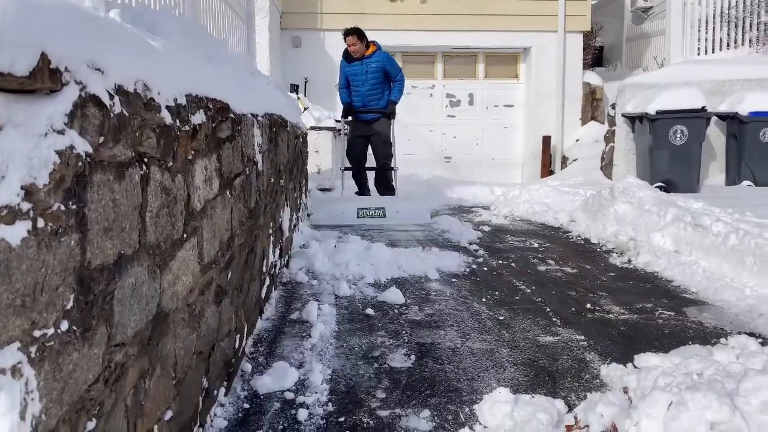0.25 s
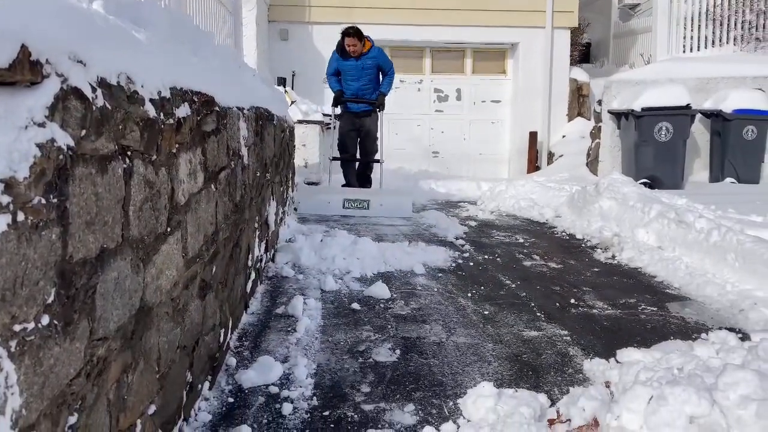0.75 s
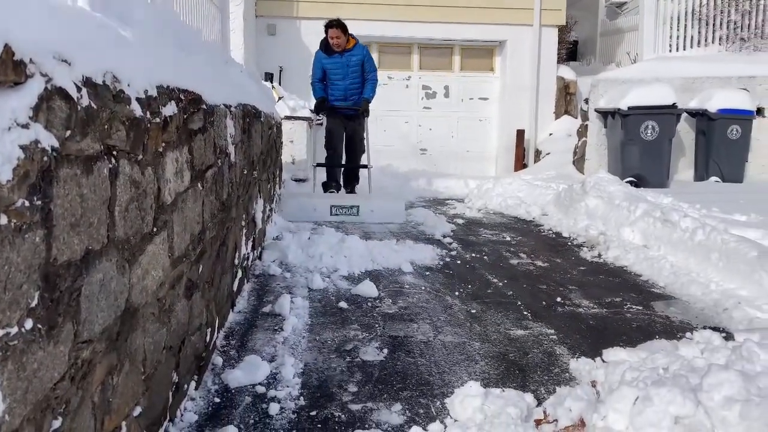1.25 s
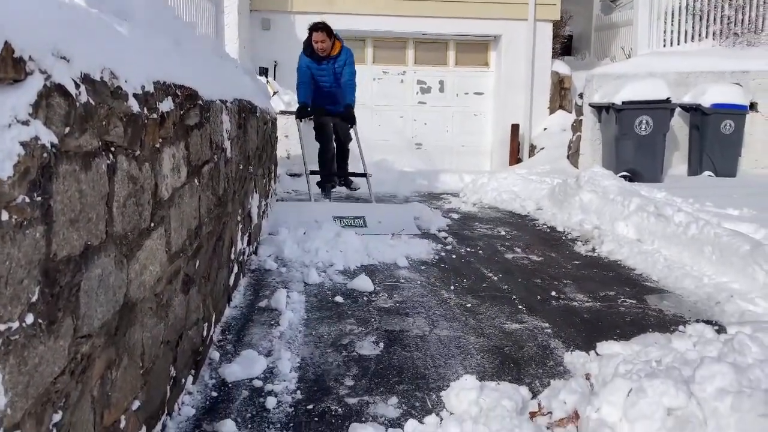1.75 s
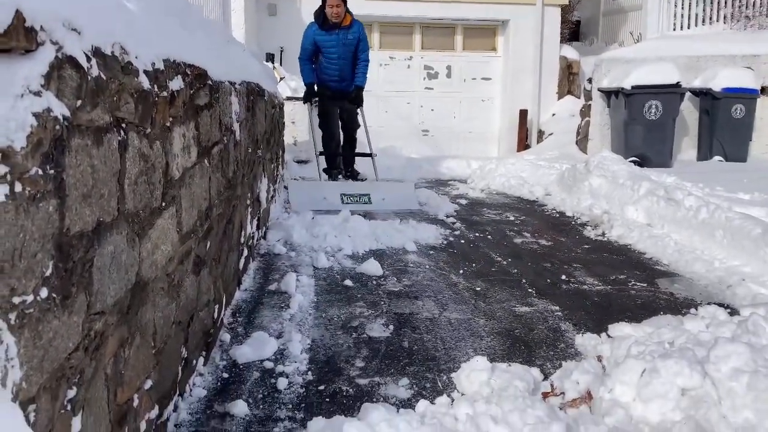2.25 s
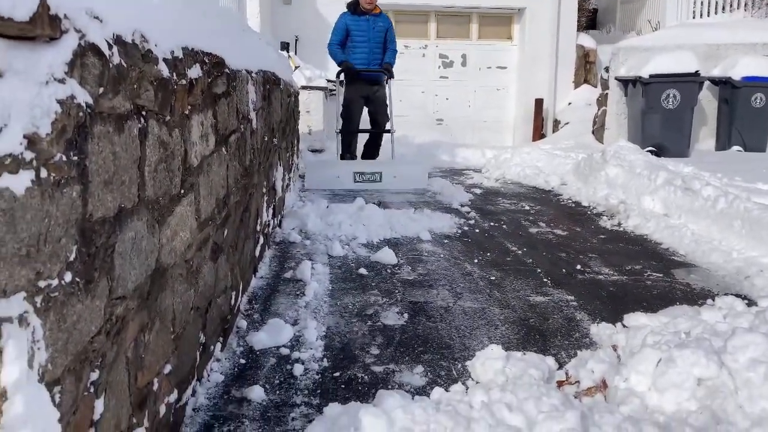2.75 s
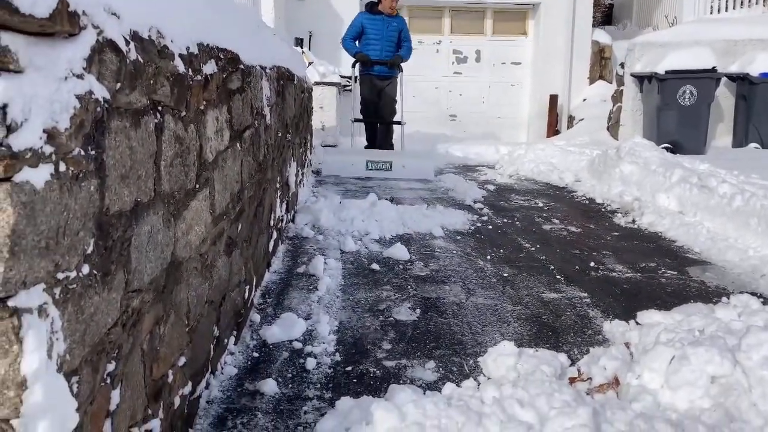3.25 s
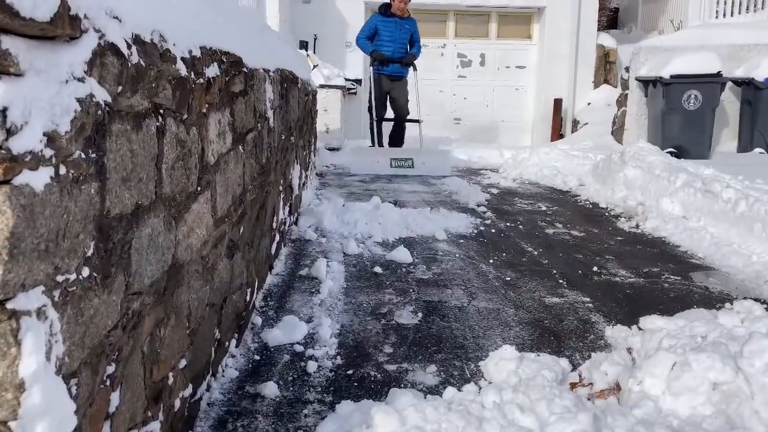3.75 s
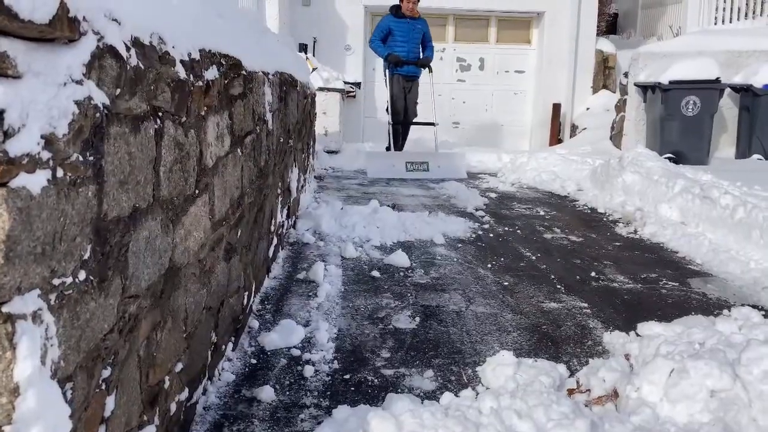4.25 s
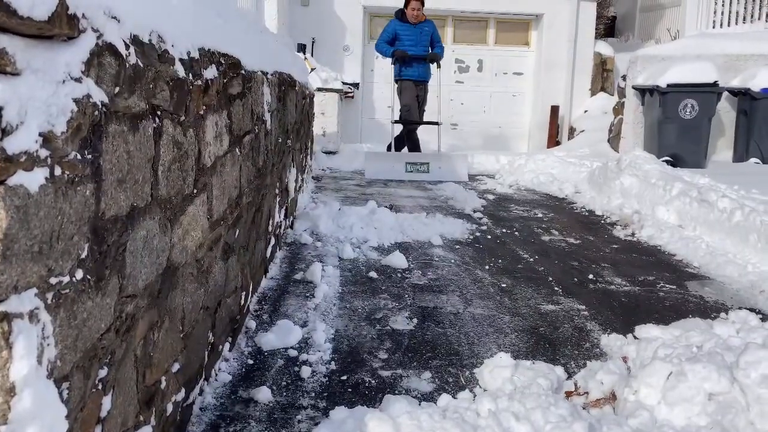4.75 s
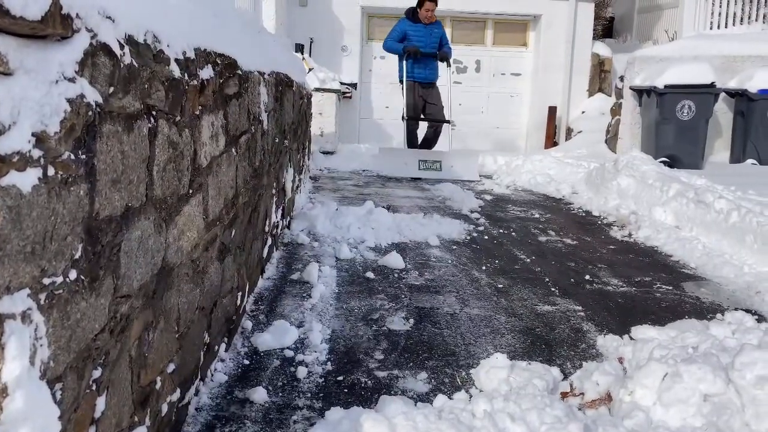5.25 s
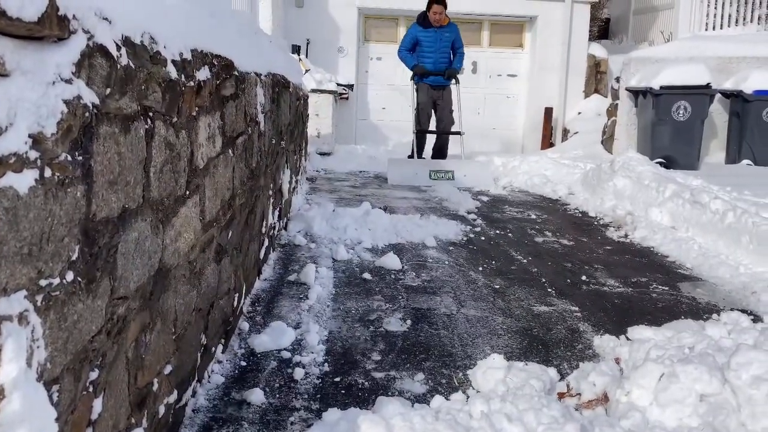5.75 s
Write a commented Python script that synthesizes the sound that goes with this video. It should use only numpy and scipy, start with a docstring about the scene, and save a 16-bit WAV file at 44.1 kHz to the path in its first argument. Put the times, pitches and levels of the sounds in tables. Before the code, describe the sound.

Outdoors on an icy driveway, a wide plastic snow pusher is shoved in short uneven strokes. Its hollow scoop drums and booms while the edge rasps over asphalt and crushes gritty ice. Knocks and clacks punctuate the pushes. Scraping is frequent until past four seconds, then nearly stops for a second with faint boot shuffles, and resumes strongly. The stereo microphone catches quiet air and small low wind buffets.

```python
"""Snow pusher on icy asphalt

A wide plastic snow pusher is shoved in strokes along an icy driveway, beside a stone wall.
Random slips of its edge drum on the scoop; slips and stones ring the edge; coarse ice rattles the ribs.
Filtered click trains make the hiss of crushed grit; single clicks drive ridge knocks and edge landings.
Boots shuffle, a few ice crumbs tick, and filtered noise gives wind buffets, tumbling snow and outdoor air."""
import sys
import numpy as np
from scipy import signal
from scipy.fft import rfft, irfft, next_fast_len
from scipy.io import wavfile
from scipy.ndimage import uniform_filter1d

SR = 44100
rng = np.random.default_rng(int(sys.argv[2]) if len(sys.argv) > 2 else 0)


def dump(signal):
    """Clip the signal to [-1, 1] and save it as 16-bit WAV at the path in sys.argv[1]."""
    limited = np.clip(np.atleast_2d(signal).T, -1, 1)
    pcm = np.round(limited * 32767).astype(np.int16)
    wavfile.write(sys.argv[1], SR, pcm)


N = 264159
TIME_S = np.arange(N) / SR
CUTOFF_HZ = 16000
AIR_DB = -42.5  # before the air's trim
TAIL_S = 0.055  # time constant of the tail's power

# All dB are relative; each voice adds its own trim.
# Distant outdoor air. Each row: frequency in Hz, density in dB per Hz.
AIR_SPECTRUM = [(12, -41), (20, -21), (44, -3), (70, -6.5), (146, -18), (216, -15), (400, -23), (700, -30),
                (1500, -36), (2800, -43), (4500, -53), (9000, -57), (16000, -55)]
# Boots shuffle in the snow. Each row: centre in seconds, level in dB, bell length in seconds.
SHUFFLES = [(.02, -61, 0.053), (.14, -58, .035), (4.96, -54, 0.023), (5.005, -52.5, 0.02),
            (5.05, -57, 0.024), (5.135, -52.5, 0.029), (5.185, -58, .015)]
# Trodden snow. Each row: frequency in Hz, density in dB per Hz.
SNOW_SPECTRUM = [(200, -16), (700, 3), (1600, -2), (2100, -2), (2800, 0.5), (4500, -9), (8000, -12),
                 (15000, -19)]
# Pushes of the blade. Each row: start in seconds, length in seconds, attack in seconds,
# release in dB per second, swell from start to end in dB; end levels of scoop boom, edge rasp and
# grit hiss in dB; from the blade's lean, tilts of scoop, edge and grit in dB, strip ring over hiss in dB.
SHOVES = [ (0.219, 0.043, 0.013, 258, 3.5, -16, -23.5, -32.5, -3, -2, 3.5, -17),
          (0.302, 0.19, 0.0069, 260, -18.5, -39.5, -53.5, -55, -10.5, -8, -0.5, -14),
          (0.53, 0.11, 0.0096, 258, 10.5, -19.5, -30.5, -42, -10, -6, 1, -6),
          (0.72, .16, 0.051, 246, 18, -10, -20, -38, -4.5, -10, 1.5, -9),
          (.95, .09, .013, 236, 6, -20.5, -27, -43.5, -7, -6, 3, -22),
          (1.027, 0.12, 0.029, 257, -3.5, -26, -34.5, -35.5, 1, -8, 4.5, -24),
          (1.113, 0.32, .034, 208, 8, -9, -14, -31, -2.5, -2, -2.5, -27),
          (1.441, 0.16, .05, 231, -4, -13.5, -21, -32.5, 5, 1, -4.5, -23),
          (2.022, 0.039, 0.0054, 395, 0.5, -13, -21, -32, -3.5, 6, -5, -12),
          (2.177, .045, 0.021, 230, 1, -21.5, -30.5, -34.5, -6, -1, 5, -4),
          (2.281, 0.24, 0.012, 239, -1, -20.5, -34, -49.5, -6.5, -4, 2.5, -14),
          (2.515, 0.09, 0.024, 260, -6, -51, -48, -46.5, -1, 1, 4.5, -19),
          (2.624, 0.19, 0.06, 205, 1, -18, -26.5, -37, 7.5, -3, 2.5, -27),
          (2.804, 0.14, 0.023, 241, -2, -26, -39, -43.5, -2, 1, -2.5, -11),
          (2.968, 0.078, 0.042, 210, 3.5, -15.5, -22.5, -35, -4, -9, -4.5, -6.5),
          (3.046, 0.14, 0.024, 330, -3.5, -27, -35, -42.5, 2, -1.5, 0, -8),
          (3.377, 0.13, .006, 230, 11.5, -15, -17.5, -30.5, -3, -0.5, -2, -8),
          (3.557, 0.18, 0.027, 300, 4, -34.5, -42, -54.5, -6, -9, 0, -3.5),
          (3.793, 0.11, 0.0082, 217, 22, -15, -20, -34.5, -5, 1, -2, -5),
          (4.002, 0.26, 0.038, 183, 17, -15.5, -25.5, -44, -6.5, -4.5, -4, -13),
          (4.268, .142, 0.03, 362, 5, -22.5, -36, -48.5, -15, 5, -1, -13),
          (5.3, 0.1, 0.022, 350, 26.5, -19, -25, -42, -4, 5, -7, -9),
          (5.465, .28, 0.017, 193, 15.5, -14.5, -23.5, -42, -10, 5.5, -4, -10),
          (5.74, 0.29, 0.025, 205, 5, -14.5, -22, -40.5, -4.5, 14, -4.5, -7)]
# How a voice follows a push. Each row: build-up in seconds (sign has no effect), share of the swell,
# share of the release rate, lingering tail in dB.
BOOM_RESPONSE = (-0.0065, 1.0, 0.65, -50)
RASP_RESPONSE = (0.01, 1.0, 1.0, -17.5)
HISS_RESPONSE = (0.02, 0.75, 1.2, -12)
# Short uneven moments in the scrape. Each row: centre in seconds, bell length in seconds,
# change of boom in dB, of rasp in dB, of hiss in dB.
UNEVEN_MOMENTS = [(0.383, 0.023, 5, -7, -7), (0.915, 0.025, -3.5, 2, 9), (1.235, 0.021, 2, 4.5, 1),
                  (1.356, 0.018, 4, 2.5, 3.5), (1.429, 0.032, 4.5, -3.5, 2), (1.52, 0.019, 2, 1.5, 4),
                  (2.045, 0.01, 6, 0.5, 5), (2.213, .01, 8.5, -3, -2.5), (2.299, 0.021, 0, 1.5, 7.5),
                  (2.67, 0.032, 0.5, 2.5, 4), (2.79, 0.012, 2.5, 3.5, -3.5), (3.023, 0.0084, -3, 3, 4.5),
                  (3.208, 0.017, 6.5, 2.5, 3.5), (3.483, 0.0075, 4, 0.5, 3.5), (3.822, 0.023, -2, -0.5, 8),
                  (3.916, .012, 2.5, -1.5, -2.5), (4.164, 0.037, 4, 3.5, 2), (5.316, 0.018, -2, 1, 10.5),
                  (5.395, 0.0075, 1.5, 4, 4)]
# Scoop resonances. Each row: frequency in Hz, width in Hz, gain in dB.
SCOOP_MODES = [(154.2, 29, -3), (217.7, 32, -6), (273, 22, 0), (332.5, 26.6, 7), (368, 22, -9),
               (416.5, 21, 0), (473, 22, 0), (470.7, 5.7, -7.5)]
# Stiff edge resonances. Each row: frequency in Hz, width in Hz, gain in dB.
EDGE_MODES = [(646, 87, 9.5), (759, 69, 7), (883, 100, -5.5), (1005, 22, 1.5), (1162, 15, -5.5)]
# Moulded rib resonances. Each row: frequency in Hz, width in Hz, gain in dB.
RIB_MODES = [(1330, 70, -1.5), (1586, 50, 6.5), (1734, 140, 6.5), (1853, 78, -0.5), (2146, 58, -2),
             (2430, 150, 1.5), (2740, 240, -14.5), (3240, 120, -6.5), (3360, 75, -9), (3940, 110, -1)]
# Thin wear strip along the edge. Each row: frequency in Hz, width in Hz, gain in dB.
STRIP_MODES = [(4080, 70, -8), (4330, 100, 4), (4520, 70, -4), (7300, 250, -8), (7800, 250, -6)]
# Crushed grit. Each row: frequency in Hz, density in dB per Hz.
GRIT_SPECTRUM = [(900, -11), (2000, 3), (2700, 1), (3300, -0.5), (3750, 1.5), (4100, -0.5), (5500, -2.5),
                 (6400, 2), (7100, 0.5), (8200, -4), (10500, -3.5), (13000, -6), (16000, -15)]
# Wall and ground reflections widen the blade. Each row: frequency in Hz, side less mid in dB.
BLADE_WIDTH = [(140, -23.5), (210, -37), (330, -14), (500, -8), (770, -4), (1170, 1), (2700, -7)]
# Grit arrives more directly. Each row: frequency in Hz, side less mid in dB.
GRIT_WIDTH = [(2000, -0.5), (5500, -1), (9000, -14), (16000, -68)]
# The edge is set down on the asphalt. Each row: time in seconds, peak in dB.
LANDINGS = [(.227, -9), (.535, -15), (2.027, 5.5), (2.187, -10), (2.638, -10), (2.983, -16), (3.385, -11),
            (3.876, -3), (4.588, -18.5), (5.387, -18)]
# The blade catches on a ridge; the two faintest rows, at 4.676 and 5.184 s, are soft handling knocks # in the
# rest between strokes. Each row: time in seconds, peak in dB, whole-blade flex in dB.
KNOCKS = [(0.256, -5, -6.5), (0.269, -4, -18), (.318, -12, -38), (0.626, -10, -14), (.765, -18, -12.5),
          (0.858, -7, -24), (0.873, -6, -31), (1.186, 0, -6.5), (1.35, -13, -15), (1.365, 2, -24),
          (1.409, -13, -16), (1.512, -4, -13), (2.027, -14, -36), (2.045, -9, -4), (2.223, -12, -12),
          (3.022, -25, -4), (3.898, -3.5, -38), (4.156, -3, -13), (4.591, -21.5, -40), (4.676, -43, -34),
          (5.184, -46, -42), (5.404, -11, -7.5), (5.748, -7, -16), (5.838, -6.5, -11.5)]
# Flex of the whole blade. Each row: frequency in Hz, width in Hz, gain in dB.
FLEX_MODE = [(193, 66, 2.5)]
# Puffs of air on the microphone. Each row: centre in seconds, peak in dB, bell length in seconds.
PUFFS = [(0.263, -29, 0.014), (.605, -32, 0.084), (0.906, -32, 0.031), (1.115, -30, 0.045),
         (1.423, -26, 0.064), (1.77, -34.5, .02), (2.04, -24.5, 0.013), (3.49, -33, 0.036),
         (3.616, -20.5, 0.011), (4.12, -20.5, 0.016), (4.237, -23, 0.014), (4.45, -33.5, 0.043),
         (4.542, -27, 0.0089), (4.963, -35, 0.014), (5.19, -31.5, 0.015), (5.273, -37, 0.013),
         (5.405, -16, 0.031), (5.585, -22.5, 0.054)]
# Wind on the ports. Each row: frequency in Hz, density in dB per Hz.
WIND_SPECTRUM = [(15, -35), (35, -18), (60, 7.5), (90, 4.5), (130, -5.5), (200, -8.5), (500, -66)]
# Ice crumbs crack or fall. Each row: time in seconds, peak in dB, nominal pitch in Hz.
CRUMBS = [(0.884, -14, 7900), (1.486, -6.5, 4030), (3.46, -5, 4300), (4.145, -22, 8600),
          (4.473, -26.5, 5800), (4.736, -35.5, 3980), (4.996, -28, 3500)]


def from_db(db):
    """Decibels to gain."""
    return 10 ** (np.asarray(db) / 20)


def rms_one(x):
    """Scale to unit power."""
    return x / np.sqrt(np.mean(x ** 2) + 1e-20)


def steady(x, span_s):
    """Unit power over every short span; faster grain stays."""
    power = uniform_filter1d(x ** 2, max(int(span_s * SR), 8))
    return x / np.sqrt(power + 1e-12)


def colour(x, spectrum):
    """Filter by (Hz, dB) points joined on a log axis."""
    hz, db = np.transpose(spectrum)
    size = next_fast_len(N + 8192)
    bins_hz = np.maximum(np.arange(size // 2 + 1) * SR / size, 1)
    gain = from_db(np.interp(np.log(bins_hz), np.log(hz), db))
    return irfft(rfft(x, size) * gain, size)[..., :N]


def resonate(x, modes):
    """Parallel two-pole resonances (Hz, width Hz, dB)."""
    out = 0
    for hz, width_hz, db in modes:
        r = np.exp(-np.pi * width_hz / SR)
        poles = [1, -2 * r * np.cos(2 * np.pi * hz / SR), r * r]
        zeros = np.array([1, 0, -1]) * (1 - r * r) / 2
        out = out + from_db(db) * signal.lfilter(zeros, poles, x + 1e-18)
    return out


def band(x, low_hz, high_hz):
    """Second-order band-pass."""
    sos = signal.butter(2, [low_hz, min(high_hz, .45 * SR)], "band", fs=SR, output="sos")
    return signal.sosfilt(sos, x)


def tilt(x, pivot_hz, tilt_db):
    """Raise what lies above the pivot against what lies below it."""
    low = signal.sosfiltfilt(signal.butter(3, pivot_hz, fs=SR, output="sos"), x)
    return low * from_db(-tilt_db / 2) + (x - low) * from_db(tilt_db / 2)


def die_away(x, decay_s):
    """Each click becomes a falling exponential of the same height."""
    return signal.lfilter([1], [1, -np.exp(-1 / (decay_s * SR))], x + 1e-18)


def grains(per_s, spread_db):
    """Clicks of random sign at random moments, mostly small and a few large."""
    hits = rng.random(N) < per_s / SR
    heights = from_db(spread_db * np.minimum(rng.exponential(1, N), 4))
    return hits * heights * rng.choice([-1, 1], N)


def strikes(rows):
    """One click for each (s, dB)."""
    clicks = np.zeros(N)
    for s, db in rows:
        clicks[int(s * SR)] = from_db(db)
    return clicks


def bell(centre_s, length_s):
    """Gaussian rise and fall."""
    return np.exp(-.5 * ((TIME_S - centre_s) / length_s) ** 2)


def swells(rows):
    """Bell-shaped rises of level, one for each (s, dB, length s)."""
    return sum(from_db(db) * bell(s, length_s) for s, db, length_s in rows)


def stereo(mid, side, width, left_db):
    """Left and right from a common part and a scattered part."""
    side = colour(side, width)
    return np.array([(mid + side) * from_db(left_db / 2), (mid - side) * from_db(-left_db / 2)])


def delay_left(pair, lag_ms):
    """Sound reaches the left port a little later."""
    return np.array([np.interp(TIME_S - lag_ms / 1000, TIME_S, pair[0]), pair[1]])


def drift(per_s):
    """A slow wander between random points of unit spread."""
    return np.interp(TIME_S * per_s, np.arange(1000), rng.standard_normal(1000))


def rub(x, modes, wander_db):
    """The contact point roams along the edge, favouring now one resonance, now another."""
    return sum(resonate(x * from_db(wander_db * drift(12)), [mode]) for mode in modes)


def scatter(x, share_db, decay_s):
    """Ripples cross the blade many times, leaving dense fine resonances."""
    size = 2048
    ripples = rng.standard_normal(size) * np.exp(-TIME_S[:size] / decay_s)
    return x + from_db(share_db) * signal.fftconvolve(x, ripples / np.linalg.norm(ripples))[:N]


def air():
    """The quiet neighbourhood: steady coloured noise."""
    mid, side = rms_one(colour(rng.standard_normal((2, N)), AIR_SPECTRUM))
    return from_db(AIR_DB - 1.0) * (mid + side * [[1], [-1]]) * from_db([[1.2], [-1.2]])


def boots():
    """Snow crunches softly under a shifting foot: coloured clicks in short swells."""
    crunch = np.array([grains(1500, 4.2) for _ in range(2)])
    return swells(SHUFFLES) * rms_one(colour(crunch, SNOW_SPECTRUM))


def envelope(start_s, length_s, attack_s, release_db_per_s, swell_db, end_db,
             build_up_s, swell_share, release_share):
    """The edge takes hold, the pressure swells evenly, then the sound drops away."""
    age_s = TIME_S - start_s
    held_db = end_db + swell_share * swell_db * (np.clip(age_s / length_s, 0, 1) - 1)
    release_db = -release_share * release_db_per_s * np.maximum(age_s - length_s, 0)
    onset = np.clip(age_s / np.hypot(attack_s, build_up_s), 0, 1)
    return onset * from_db(held_db + release_db)


def uneven_moments():
    """Boom, rasp and hiss each briefly rise or fall, in bells of dB."""
    return sum(np.outer(changes_db, bell(s, length_s)) for s, length_s, *changes_db in UNEVEN_MOMENTS)


def shoves():
    """Pushes and their faint tails set boom, rasp and hiss in dB; hiss power weights the lean's colour."""
    start, length, attack, release, swell, boom, rasp, hiss, *lean = np.transpose(SHOVES)
    voices = (boom, BOOM_RESPONSE), (rasp, RASP_RESPONSE), (hiss, HISS_RESPONSE)
    levels_db = []
    for end_db, (*response, tail_db) in voices:
        pushes = zip(start, length, attack, release, swell, end_db)
        each = np.array([envelope(*push, *response) for push in pushes]) ** 2 + 1e-14
        power = each.sum(axis=0)
        tail = from_db(tail_db) ** 2 * die_away(power, TAIL_S) / (TAIL_S * SR)
        levels_db.append(10 * np.log10(power + tail))
    # each and power are now those of the hiss
    return np.array(levels_db) + uneven_moments(), np.array(lean) @ each / power


def scoop(slips, boom_db, tilt_db):
    """Slips of the edge drum on the hollow scoop, whose resonances end steeply at the top."""
    body = signal.butter(5, 540, fs=SR, output="sos")
    drives = slips, grains(900, 2.2)
    rings = (signal.sosfilt(body, band(rub(x, SCOOP_MODES, wander_db=5.0), 121, 920)) for x in drives)
    mid, side = (steady(tilt(x, 255, tilt_db), span_s=0.0318) for x in rings)
    pair = stereo(mid, side, BLADE_WIDTH, left_db=0.6)
    return from_db(boom_db - 1.77) * delay_left(pair, lag_ms=0.019)


def edge(slips, chatter, rasp_db, tilt_db):
    """Slips and the asphalt's small stones ring the stiff edge."""
    stones = chatter * grains(5000, 2.2)
    drives = rms_one(slips) + 1.6 * rms_one(stones), chatter * grains(5000, 2.2)
    rings = (band(rub(x, EDGE_MODES, wander_db=5.0), 500, 1420) for x in drives)
    dense = (scatter(x, share_db=-8.5, decay_s=0.0055) for x in rings)
    mid, side = (steady(tilt(x, 710, tilt_db), span_s=0.028) for x in dense)
    return from_db(rasp_db - 0.48) * stereo(mid, side, BLADE_WIDTH, left_db=1.0)


def ribs(chatter, rasp_db, hiss_db):
    """Coarser ice rattles the ribs, growing with both the rasp and the hiss."""
    rattles = (chatter * grains(1100, 1.8) for _ in range(2))
    rings = (rub(x, RIB_MODES, wander_db=5.5) for x in rattles)
    mid, side = (steady(band(x, 1070, 4340), span_s=0.1) for x in rings)
    level = from_db(0.71 * rasp_db + 0.41 * hiss_db - 4.0)
    return level * stereo(mid, side, BLADE_WIDTH, left_db=1.0)


def grit(chatter, hiss_db, tilt_db, ring_db, ticks):
    """Ice grains are crushed under the edge in spurts that follow the slips; the wear strip sings."""
    crushed = (colour(chatter * grains(7000, 2.7), GRIT_SPECTRUM) for _ in range(2))
    crunch = (scatter(x, share_db=-7.5, decay_s=0.012) for x in crushed)
    strip = (rms_one(resonate(chatter * grains(14000, 3.2), STRIP_MODES)) for _ in range(2))
    mid, side = (steady(tilt(x, 7600, tilt_db), span_s=0.19) + from_db(ring_db) * ring
                 for x, ring in zip(crunch, strip))
    hiss = from_db(hiss_db + 0.65) * stereo(mid, side, GRIT_WIDTH, left_db=0.3) + ticks
    # hiss and ticks reach the left port 12 samples, about a quarter of a millisecond, late
    return np.array([np.roll(hiss[0], 12), hiss[1]])


def rumble(boom_db):
    """Packed snow tumbles dully ahead of the moving blade: low noise that follows the boom."""
    mid, side = (steady(x, span_s=0.092) for x in colour(rng.standard_normal((2, N)), WIND_SPECTRUM))
    pair = (mid + from_db(-12) * side * [[1], [-1]]) * from_db([[1.0], [-1.0]])
    return from_db(0.39 * boom_db - 32.0) * pair


def landings():
    """The wide edge meets the ground in a quick spatter that rings edge and scoop."""
    spatter = die_away(strikes(LANDINGS), decay_s=0.0037) * rng.standard_normal((2, N))
    crack = from_db(-21.5) * band(spatter, 900, 8200)
    clack = from_db(-10.5) * resonate(spatter, EDGE_MODES)
    thud = from_db(-12.0) * resonate(spatter[0], SCOOP_MODES)
    return crack + clack + thud


def knocks():
    """A hard catch thumps the scoop, flexes the whole blade and rattles its edge for a moment."""
    blows = strikes([(s, db) for s, db, flex_db in KNOCKS])
    bends = strikes([(s, flex_db) for s, db, flex_db in KNOCKS])
    thump = from_db(31.5) * band(resonate(blows, SCOOP_MODES), 126, 446)
    flex = from_db(40) * band(resonate(bends, FLEX_MODE), 51, 325)
    burst = die_away(blows, decay_s=0.0062) * rng.standard_normal((2, N))
    return thump + flex + from_db(-8.5) * resonate(burst, EDGE_MODES)


def wind():
    """Brief low buffets, partly different at each port and stronger on the left."""
    mid, side = (steady(x, span_s=0.0256) for x in colour(rng.standard_normal((2, N)), WIND_SPECTRUM))
    return swells(PUFFS) * (mid + from_db(-6) * side * [[1], [-1]]) * from_db([[1.5], [-1.5]])


def crumbs():
    """Each crumb makes a short crackle around its own pitch."""
    out = np.zeros((2, N))
    for s, db, hz in CRUMBS:
        burst = die_away(strikes([(s, db)]), decay_s=0.0052) * rng.standard_normal((2, N))
        out += from_db(-6.5) * band(burst, hz * 0.56, hz * 1.21)
    return out


def scene():
    """One train of slips drives scoop and edge, and its chatter paces edge, ribs and grit."""
    (boom_db, rasp_db, hiss_db), (scoop_tilt_db, edge_tilt_db, grit_tilt_db, ring_db) = shoves()
    slips = grains(per_s=500, spread_db=2.0)
    chatter = 1 + .5 * rms_one(die_away(np.abs(slips), decay_s=0.006))
    blade = scoop(slips, boom_db, scoop_tilt_db)
    blade = blade + edge(slips, chatter, rasp_db, edge_tilt_db)
    blade = blade + ribs(chatter, rasp_db, hiss_db)
    ice = grit(chatter, hiss_db, grit_tilt_db, ring_db, crumbs())
    return air() + boots() + blade + ice + rumble(boom_db) + landings() + knocks() + wind()


def record(dry):
    """Peaks clip at full scale, then a steep low-pass cuts the top."""
    low_pass = signal.ellip(10, .1, 80, CUTOFF_HZ, fs=SR, output="sos")
    return signal.sosfilt(low_pass, np.clip(dry, -1, 1))


dry = scene()
out = record(dry)
dump(out)
```